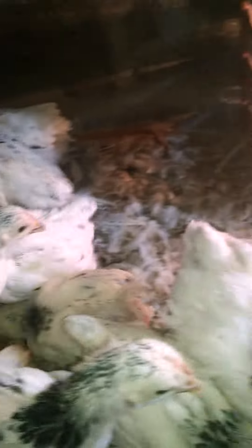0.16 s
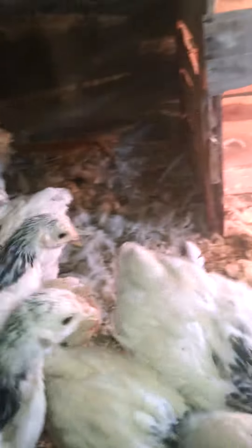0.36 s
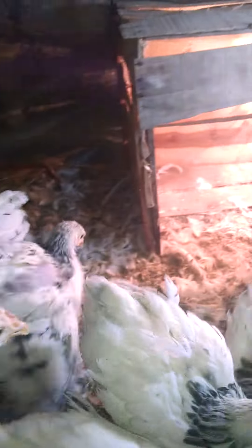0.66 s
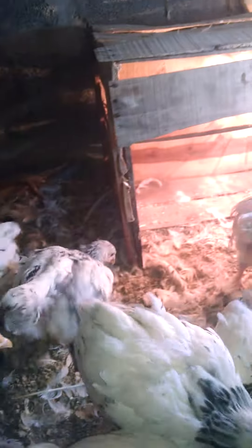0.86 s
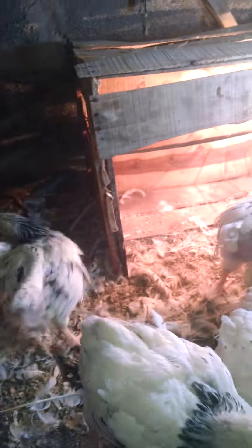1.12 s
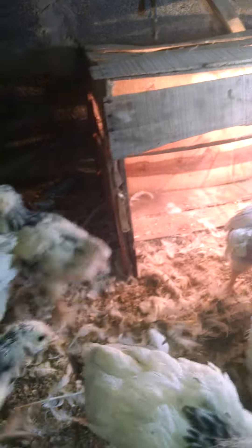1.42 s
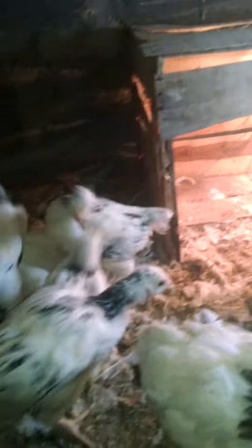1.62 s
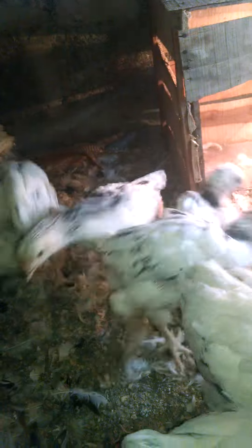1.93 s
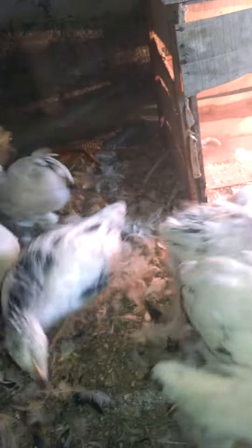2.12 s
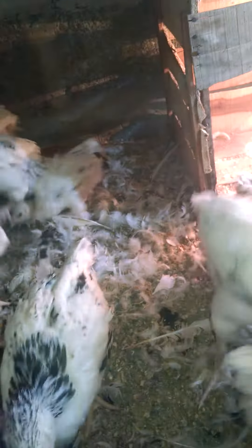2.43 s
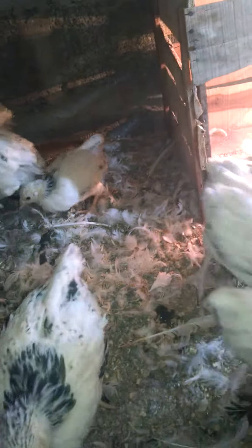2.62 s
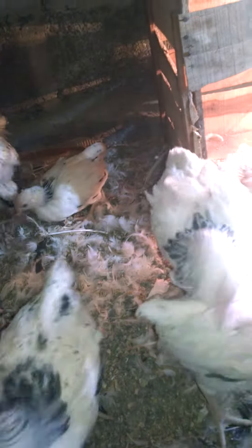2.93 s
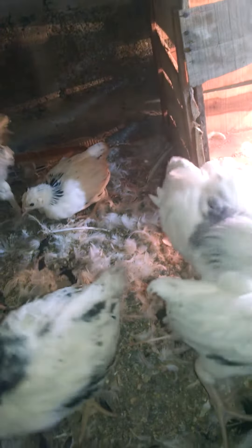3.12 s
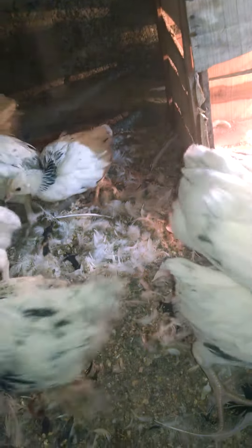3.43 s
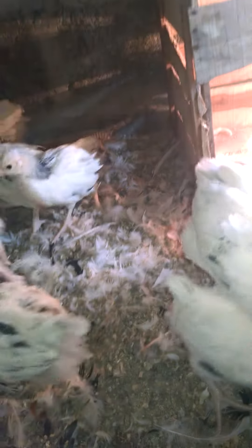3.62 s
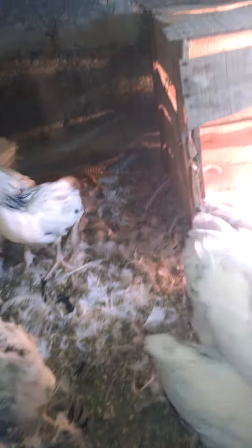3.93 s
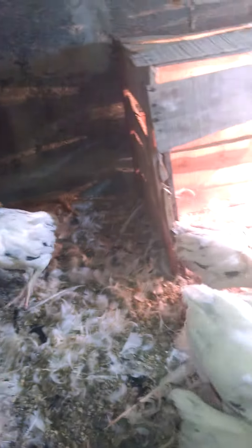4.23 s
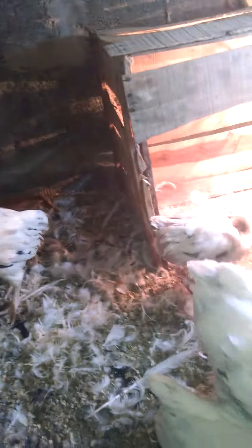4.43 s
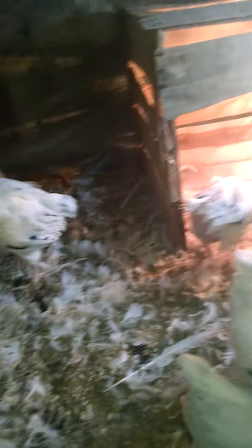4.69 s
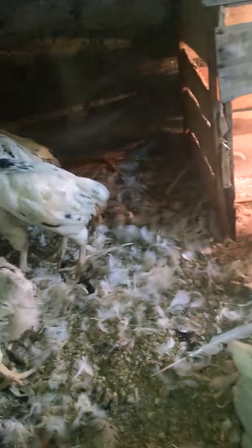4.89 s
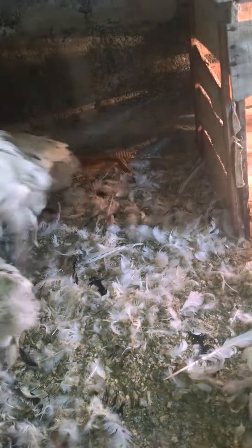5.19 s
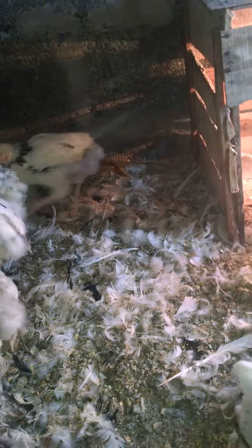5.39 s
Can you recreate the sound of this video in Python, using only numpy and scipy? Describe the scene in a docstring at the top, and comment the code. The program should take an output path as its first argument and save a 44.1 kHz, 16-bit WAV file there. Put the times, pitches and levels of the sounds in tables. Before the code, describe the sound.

Many young chicks peep over each other without pause, short falling whistles close by, with soft foot thuds and dry litter crackle in a wooden pen.

```python
"""Young chicks peep over one another all the time, in a small wooden pen, close to a hand-held phone.
Each peep is a whistle that glides down; many then break to a low note as the syrinx (voice organ) relaxes.
Feet thud on ringing floor boards and shuffle, as filtered noise; claws and beaks tick and crackle in litter.
The plank walls answer briefly, with a few echoes and a fading noise tail."""
import sys
import numpy as np
from scipy import signal
from scipy.fft import rfft, irfft, next_fast_len
from scipy.io import wavfile
from scipy.ndimage import uniform_filter1d, minimum_filter1d, map_coordinates

SR = 44100
rng = np.random.default_rng(int(sys.argv[2]) if len(sys.argv) > 2 else 0)


def write(x):
    x = np.atleast_2d(x).T
    wavfile.write(sys.argv[1], SR, np.round(np.clip(x, -1, 1) * 32767).astype(np.int16))


N = 244755  # length in samples

# All levels in the tables are relative: the functions below lift, shape or mix them further.
# Peeps that break to a low note. Each row: start in seconds, length of the glide in seconds,
# pitch at the start in Hz, pitch at the break in Hz, level in dB, level of the low note in dB.
BREAKING_PEEPS = [(0.0, 0.083, 3050, 2158, -21.5, -27.5), (0.285, 0.095, 3900, 2467, -15, -17.5),
                  (0.345, 0.1804, 3508, 2844, -14.5, -11), (0.415, .011, 2950, 2850, -17.5, -26),
                  (0.716, 0.068, 4000, 2700, -21.5, -26.5), (0.766, 0.13, 2950, 2170, -18, -28),
                  (1.098, 0.13, 3580, 2878, -22.5, -18.5), (1.283, 0.0064, 3000, 2720, -20.5, -48),
                  (1.443, 0.095, 3120, 2730, -25, -18.5), (1.448, 0.097, 4350, 2950, -17.5, -21),
                  (1.571, 0.08, 2850, 2240, -18, -33), (1.647, 0.043, 3330, 2456, -13.5, -16.5),
                  (1.871, 0.045, 2930, 2350, -18.5, -14.5), (1.977, 0.011, 4200, 3320, -12, -16.5),
                  (2.001, .022, 2950, 2426, -19, -27), (2.25, .028, 3490, 2970, -31.5, -19),
                  (2.286, 0.15, 3150, 2300, -25.5, -21), (2.354, 0.055, 3800, 2990, -18.5, -20.5),
                  (2.651, 0.2, 3900, 2600, -7.5, -12), (3.282, 0.073, 3650, 2430, -15, -17.5),
                  (3.402, 0.081, 4450, 2925, -19.5, -27), (3.745, 0.093, 3854, 2780, -16.5, -19),
                  (3.758, .026, 3800, 3150, -26, -17.5), (3.92, 0.049, 2700, 2250, -22.5, -19.5),
                  (4.052, .058, 3280, 2620, -22, -28), (4.349, 0.067, 3300, 2784, -26.5, -25.5),
                  (4.472, 0.058, 4400, 2600, -13.5, -24.5), (4.854, 0.026, 3050, 2550, -22.5, -14),
                  (4.97, .115, 3150, 2365, -24.5, -25.5), (5.32, 0.098, 3380, 3096, -20.5, -13),
                  (5.341, 0.15, 3100, 2220, -22, -22.5)]
# Peeps that only slide. Each row: start in seconds, length in seconds, pitch at the start in Hz,
# pitch at the end of the slide in Hz, arch above a straight glide in Hz (halfway), level in dB.
SLIDING_PEEPS = [(0.059, .12, 3300, 2440, -80.5, -21.5), (0.325, 0.22, 4050, 2950, 131, -20),
                 (0.567, 0.1, 4230, 4100, 27, -31.5), (0.637, .07, 3545, 3330, -78.5, -24.5),
                 (0.643, 0.083, 3983, 3220, -100, -24), (0.7, 0.057, 4020, 2393, 126, -15.5),
                 (0.799, 0.11, 3780, 3350, 56, -30), (0.904, 0.079, 3270, 2650, 168, -14.5),
                 (1.121, 0.12, 3938, 2540, 153, -18.5), (1.419, 0.048, 3970, 2510, -150, -19),
                 (1.467, 0.15, 4050, 3524, -60, -18), (1.7, 0.1, 4110, 2374, -330, -21),
                 (1.784, 0.048, 3470, 2750, 206, -12.5), (1.827, 0.044, 4280, 3530, 131, -13),
                 (1.88, .08, 3420, 3254, 18, -21.5), (1.971, 0.046, 3295, 2556, 91, -10.5),
                 (2.098, 0.11, 3795, 3330, 52, -24), (2.204, 0.042, 3150, 3640, 138, -22.5),
                 (2.266, 0.15, 3850, 2600, 59.5, -19), (2.436, .062, 3360, 2150, 150, -11),
                 (2.549, 0.065, 3274, 2300, -87, -21), (2.555, 0.057, 3280, 2900, 154, -22),
                 (2.839, 0.059, 3690, 2680, -130, -19), (2.899, 0.11, 4402, 3580, 31, -12),
                 (2.995, 0.065, 3580, 2996, 194, -12), (2.939, .11, 4290, 2740, -480, -16),
                 (2.997, 0.079, 2645, 2247, 45.5, -24), (3.048, 0.1, 3470, 2350, 198, -22.5),
                 (3.196, .08, 4300, 2460, -100, -17), (3.296, .23, 3630, 2726, 150.5, -17),
                 (3.535, 0.085, 3900, 2410, 205, -33), (3.85, 0.06, 4150, 3160, -200, -29.5),
                 (4.124, .11, 3770, 3310, -100, -29), (4.235, 0.11, 4400, 2500, 274, -23),
                 (4.291, 0.052, 3280, 2390, -59, -15), (4.525, .02, 4200, 3600, -100, -20),
                 (4.553, 0.076, 4100, 3210, -110, -20), (4.588, 0.14, 4280, 2167, -200, -19.5),
                 (4.7, 0.12, 4100, 3270, 147.5, -13), (4.784, .055, 2840, 2376, -90, -14),
                 (4.86, 0.082, 3910, 2594, -250, -17), (5.023, 0.059, 4240, 2530, -120, -15),
                 (5.114, 0.14, 3970, 3250, -59.5, -16.5), (5.226, 0.11, 3450, 2600, -36, -17),
                 (5.231, 0.035, 3090, 2524, -100, -12.5), (5.256, 0.065, 4200, 2910, 304.5, -15.5),
                 (5.444, 0.066, 3870, 3090, 153, -17), (5.501, 0.064, 2920, 2800, 7, -23)]
# Effort of a breaking peep: level in dB at the start, at the crest, at the break.
BREAKING_EFFORT_DB = [-9.5, 0, -0.5]
# Effort of a sliding peep: level in dB at the start, at the crest, at the end, after settling.
SLIDING_EFFORT_DB = [-7, -1.5, -3.5, -17.5]
# A whistle swells as it crosses this throat resonance. Each row: pitch in Hz, level in dB.
THROAT_RESONANCE = [(1500, -4), (2300, 3.5), (3100, -0.5), (3700, -3), (4400, -2)]
# Overtones of a whistle. Each row: multiple of the pitch, level in dB.
WHISTLE_OVERTONES = [(2, -23), (3, -23.5), (4, -32.5)]
# Colour of those overtones. Each row: frequency in Hz, level in dB.
BEAK_COLOUR = [(4000, 9.5), (5000, -3), (6600, 2.5), (7900, -14), (10000, -16), (15000, -5)]
# Colour of the husky noise in hard calling. Each row: frequency in Hz, level in dB per Hz.
HUSK_COLOUR = [(1000, -19.5), (2000, -1), (2500, -15.5), (3900, 9.5), (4800, -18.5), (6500, -8.5),
               (8000, -39), (15000, -28.5)]
# Basic delay of the left port. Each row: frequency in Hz, delay in seconds (each peep scales it).
LEFT_PORT_LAG = [(1200, 0.0000043), (2200, 0.00018), (3500, 0.00029)]
# The phone's body shades the left port. Each row: frequency in Hz, left minus right in dB.
PHONE_SHADE = [(1000, 3.5), (2500, 0), (3500, 0.5), (4400, -2.5), (8000, .5)]
# Feet and pecks on the ground. Each row: start in seconds, peak of the knock in dB,
# centre of the knock in Hz, level of the boom in dB.
FOOT_THUDS = [(0.136, -31.5, 540, -40.5), (0.546, -28, 412, -51), (0.844, -21.5, 385, -61),
              (0.945, -43, 377, -39), (1.026, -24, 563, -47), (1.13, -23.5, 366, -54),
              (1.572, -30, 307, -33), (1.935, -21.5, 301, -41), (2.092, -28.5, 415, -50),
              (2.266, -34, 468, -30), (2.414, -30, 441, -49), (2.94, -20, 412, -41),
              (3.694, -26.5, 550, -57), (3.742, -27.5, 573, -56), (3.969, -21.5, 414, -32.5),
              (4.14, -31, 307, -38.5), (4.413, -26, 415, -39.5), (4.827, -21, 409, -50),
              (4.965, -25, 420, -44), (5.142, -23, 592, -38), (5.334, -20, 420, -45)]
# Higher modes of the floor. Each row: frequency in Hz, width in Hz (wider dies faster), level in dB.
FLOOR_MODES = [(329, 74, -5.5), (415, 69, 4), (536, 31, -4.5), (780, 350, -27)]
# How busily the flock moves. Each row: time in seconds, trampling in dB, scratching in dB.
FLOCK_BUSTLE = [(0.0, -45.5, -56), (0.63, -50.5, -67), (0.88, -45, -65), (1.1, -45.5, -57.5),
                (1.34, -50, -61.5), (1.84, -52, -60), (2.18, -49, -62.5), (2.44, -43, -55.5),
                (2.87, -50, -67.5), (3.03, -58, -64), (3.25, -54.5, -62.5), (4.28, -46, -58.5),
                (4.62, -45, -50), (5.07, -47, -57.5), (5.25, -37, -53.5), (5.55, -43, -47)]
# Colour of the shuffling feet. Each row: frequency in Hz, level in dB per Hz.
GROUND_COLOUR = [(30, -14), (70, -6.5), (125, -2.5), (190, -6.5), (430, -3), (800, -12), (1300, -13.5),
                 (5000, -34.5)]
# Beak ticks and snapping litter. Each row: start in seconds, level in dB.
BEAK_TICKS = [(0.143, -43), (0.6692, -37.5), (1.2354, -32), (1.243, -31), (1.2607, -52), (1.841, -35.5),
              (1.8705, -34.5), (2.251, -37), (2.8454, -38), (2.935, -34.5), (3.7165, -39.5), (4.019, -38.5),
              (4.9588, -33.5), (5.0508, -33.5)]
# Colour of the dry bedding. Each row: frequency in Hz, level in dB per Hz.
LITTER_COLOUR = [(400, 0), (1200, -1.5), (3500, 11.5), (5000, 2.5), (6800, 2.5), (7900, -12), (9300, -5),
                 (14000, -31), (15800, -30)]
# How long the pen rings. Each row: frequency in Hz, time to fade by 60 dB in seconds.
PEN_FADE = [(150, 0.61), (2500, 0.032), (10000, 0.16)]

ARCH_HZ_PER_S = 1400  # the longer a breaking peep, the longer it holds its pitch before falling
TIRING_DB_PER_S = 43  # the longer a breaking peep, the weaker it is when it breaks
LOW_NOTE_HZ, LOW_NOTE_S, LOW_NOTE_FADE_DB = 1597, .026, -3.5  # low note after a break at the usual pitch
LOW_NOTE_FOLLOWS, USUAL_BREAK_HZ = 0.433, 2600  # a higher break lands on a higher low note
SETTLE_S, SETTLE_RATIO = 0.017, .95  # a sliding peep sinks a little more as it dies
ATTACK_S, RELEASE_S = .008, .006
BOOM_HZ, BOOM_WIDTH_HZ, BOOM_DB = 127, 23.6, 7.5  # lowest floor mode, and the lift added to each boom
TOP_HZ = 15600  # the phone keeps nothing above this


def chorus(distant_db=-46, joining_db=-13.0, husk_db=-20):
    """Farther birds never stop and join in when the near ones call; hard calling adds a husky edge."""
    near = near_chicks()
    husk = unit(filtered(pair(apart=0.45), lambda hz: amp(along(HUSK_COLOUR, hz))))
    far_level = amp(distant_db) + amp(joining_db) * loudness(near, seconds=0.078)
    far = far_level * far_chicks()
    husky_edge = amp(husk_db) * loudness(near, seconds=0.029) * husk
    return amp(-0.29) * near + far + husky_edge


def near_chicks(pan_db=-4.0, pan_spread_db=3.52, aside=1.023, aside_spread=0.13):
    """The birds around the phone, mostly a little to the right: there louder and earlier."""
    out = np.zeros((2, N))
    calls = [(s, breaking(*row)) for s, *row in BREAKING_PEEPS]
    calls += [(s, sliding(*row)) for s, *row in SLIDING_PEEPS]
    places = rng.standard_normal((len(calls), 2))
    for (start, call), (turn, shade) in zip(calls, places):
        sound = peep(*call, pan_db=pan_db + pan_spread_db * shade, aside=aside + aside_spread * turn)
        add(out, start, sound)
    return out


def breaking(glide, start_hz, break_hz, db, low_db):
    """Lengths, pitches and levels of a peep that arches down, then drops to the low note."""
    low_hz = LOW_NOTE_HZ + LOW_NOTE_FOLLOWS * (break_hz - USUAL_BREAK_HZ)
    middle_hz = (start_hz + break_hz) / 2 + ARCH_HZ_PER_S * glide
    first, top, last = np.add(db, BREAKING_EFFORT_DB)
    levels = [first, top, last - TIRING_DB_PER_S * glide, low_db, low_db + LOW_NOTE_FADE_DB]
    return glide, LOW_NOTE_S, [start_hz, middle_hz, break_hz, low_hz], levels


def sliding(glide, start_hz, end_hz, arch_hz, db):
    """Lengths, pitches and levels of a peep that slides down and settles without a break."""
    middle_hz = (start_hz + end_hz) / 2 + arch_hz
    pitches = [start_hz, middle_hz, end_hz, end_hz * SETTLE_RATIO]
    return glide, SETTLE_S, pitches, np.add(db, SLIDING_EFFORT_DB)


def peep(glide, tail, pitches, levels, pan_db, aside, waver=0.00828, flutter_db=3.0, rasp=0.12,
         half_db=-20, drop=4):
    """One whistle with overtones as it reaches the two ports, the left one later."""
    glide, tail = max(glide, .004), max(tail, .004)
    t = np.arange(int((glide + tail) * SR)) / SR
    size = len(t)
    # a smooth curve through the start, middle and end pitches
    curve = np.polyfit([0, .5, 1], pitches[:3], 2)
    hz = np.polyval(curve, np.minimum(t / glide, 1))
    # after the glide the pitch moves fast, then settles on the last pitch
    ending = np.clip((t - glide) / tail, 0, 1)
    hz += (pitches[3] - pitches[2]) * (1 - (1 - ending) ** drop)
    hz *= 1 + waver * wobble(160.7, size)
    # half the delay goes to each port, with opposite signs
    lag_cycles = np.outer([.5, -.5], hz * aside * along(LEFT_PORT_LAG, hz))
    phase = 2 * np.pi * (np.cumsum(hz) / SR - lag_cycles)

    tone = np.sin(phase) * (1 + rasp * wobble(1400, size))
    for order, db in WHISTLE_OVERTONES:
        overtone_db = db + along(BEAK_COLOUR, order * hz) + 1.85 * wobble(47.3, size)
        tone += amp(overtone_db) * np.sin(round(order) * phase)
    # on low notes the slack membrane doubles its period: lines at half and one and a half times the pitch
    slack = np.clip((3400 - hz) / 1000, 0, 1)
    half_lines = np.sin(1.5 * phase) + .5 * np.sin(phase / 2)
    tone += slack * amp(half_db + 4 * wobble(25, size)) * half_lines

    edges = np.clip(t / ATTACK_S, 0, 1) * np.clip((t[-1] - t) / RELEASE_S, 0, 1)
    level = effort(t, glide, tail, levels) + along(THROAT_RESONANCE, hz)
    pan = amp([[pan_db / 2], [-pan_db / 2]])
    return tone * edges * amp(level + flutter_db * wobble(107.9, size)) * pan


def effort(t, glide, tail, levels, crest=0.68):
    """Level of a peep in dB: a rounded swell over the glide, then straight steps through the ending."""
    first, top, last = levels[:3]
    u, crest = t / glide, np.clip(crest, .1, .9)  # both as parts of the glide
    rise = (first - top) * (1 - u / crest) ** 2
    fall = (last - top) * ((u - crest) / (1 - crest)) ** 2
    swell = top + np.where(u < crest, rise, fall)
    steps = np.linspace(glide, glide + tail, len(levels) - 2)
    return np.where(u < 1, swell, np.interp(t, steps, levels[2:]))


def far_chicks(count=130):
    """The rest of the flock at an even level: the same glide at random times, lengths and pitches."""
    out = np.zeros((2, N))
    for k, (when, length, voice, size, place) in enumerate(rng.random((count, 5))):
        pitches = np.array([4050, 3300, 2600, 2250]) * (.85 + .27 * voice)
        levels = np.array([10, -7, 13.0, -13]) - 6 * size
        call = peep(.07 + .12 * length, 0.0234, pitches, levels, pan_db=-2.5, aside=0.66 + 0.39 * place)
        add(out, (k + when) / count * N / SR, call)
    return unit(out)


def thuds():
    """Soft feet boom on the floor; harder blows knock its higher modes, which ring and die away."""
    out, t = np.zeros(N), np.arange(SR // 6) / SR
    boom = np.exp(-np.pi * BOOM_WIDTH_HZ * t) * np.sin(2 * np.pi * BOOM_HZ * t)
    for s, db, centre, boom_db in FOOT_THUDS:
        ring = np.zeros(len(t))
        for hz, width, level in FLOOR_MODES:
            # modes far from the centre of the knock are weaker
            mode_db = level + rng.normal(0, 0.71) - 15.0 * np.log2(hz / centre) ** 2
            mode = np.cos(2 * np.pi * hz * rng.normal(1, 0.052) * t)
            ring += amp(mode_db) * np.exp(-np.pi * width * t) * mode
        # the blow is followed by a short scuff of the toes
        scuff = 0.11 * rng.standard_normal(len(t)) * np.exp(-t / 0.016)
        blow = signal.fftconvolve((t == 0) + scuff, ring)
        add(out, s, amp(db + 1.5) * blow / np.abs(blow).max())
        add(out, s, amp(boom_db + BOOM_DB) * boom)
    return out


def litter():
    """Many feet shuffle on the ground; claws and beaks crackle in dry bedding, all as shaped noise."""
    trample_db, scratch_db = bustle()
    steps = pair(apart=0.39) * amp(5.24 * wobble(35, N))
    shuffle = unit(filtered(steps, lambda hz: amp(along(GROUND_COLOUR, hz))))
    # slow and fast level changes make the noise grainy
    grain = amp(5 * wobble(45, N) + 5 * wobble(900, N))
    crackle = unit(pair(apart=0.99) * grain) * amp(scratch_db + 11.5)
    t = np.arange(SR // 25) / SR
    for s, db in BEAK_TICKS:
        tick = rng.standard_normal((2, len(t))) * amp(-60 * t / 0.072)
        add(crackle, s, amp(db + 5) * tick)
    bedding = filtered(crackle, lambda hz: amp(along(LITTER_COLOUR, hz) + 5.5))
    return shuffle * amp(trample_db + 3.5) + bedding


def bustle():
    """How busily the feet trample and scratch, in dB, one value per sample."""
    s, *columns = np.transpose(FLOCK_BUSTLE)
    return [np.interp(np.arange(N) / SR, s, column) for column in columns]


def pen(x, wet_db, walls_db, count=8):
    """A few plank echoes and a short diffuse tail of noise, each pitch fading at its own speed."""
    hz, t, z = signal.stft(rng.standard_normal((2, SR // 3)), SR, nperseg=256)
    fade = amp(-60 * t / along(PEN_FADE, hz)[:, None])
    tail = signal.istft(z * fade, SR, nperseg=256)[1]
    # the tail starts 5 ms after the direct sound
    answer = amp(wet_db) * np.pad(tail / np.linalg.norm(tail[0]), ((0, 0), (SR // 200, 0)))
    for port in answer:
        echo_at = (rng.uniform(.003, .02, count) * SR).astype(int)
        port[echo_at] += amp(walls_db) * rng.choice([-1, 1], count) / np.sqrt(count)
    return signal.fftconvolve(x, answer, axes=1)[:, :N]


def amp(db):
    """Decibels to gain."""
    return 10 ** (np.asarray(db) / 20)


def unit(x):
    """Scale to rms (average strength) 1."""
    return x / np.sqrt(np.mean(x ** 2) + 1e-20)


def along(points, hz):
    """Read a curve of (Hz, value) points on a log frequency axis."""
    f, v = np.transpose(points)
    return np.interp(np.log(hz + 1), np.log(f + 1), v)


def wobble(rate, size):
    """A smooth random curve, with rate random points a second."""
    knots = rng.standard_normal(int(size * rate / SR) + 4)
    return map_coordinates(knots, [np.arange(size) * rate / SR])


def filtered(x, response):
    """Multiply the spectrum of x by a response that depends on frequency."""
    m = next_fast_len(x.shape[-1] + 8192)
    spectrum = rfft(x, m) * response(np.fft.rfftfreq(m, 1 / SR))
    return irfft(spectrum, m)[..., :x.shape[-1]]


def add(track, s, sound):
    """Mix a sound into the track at time s, in seconds."""
    part = track[..., max(round(s * SR), 0):][..., :sound.shape[-1]]
    part += sound[..., :part.shape[-1]]


def pair(apart):
    """Noise at the two ports: a common part and a part that differs."""
    mid, side = rng.standard_normal((2, N))
    return unit(np.array([mid + apart * side, mid - apart * side]))


def loudness(x, seconds):
    """Running rms (average strength) of both ports together."""
    return np.sqrt(np.abs(uniform_filter1d(np.mean(x ** 2, axis=0), int(seconds * SR))))


def scene():
    """Chicks and their feet inside the pen."""
    birds = filtered(chorus(), lambda hz: amp(np.outer([.5, -.5], along(PHONE_SHADE, hz))))
    flock = birds + thuds()
    return flock + pen(flock, wet_db=-11.5, walls_db=-16.5) + litter()


def record(dry):
    """A fast limiter holds peaks just under full scale; the phone then cuts all above its band limit."""
    needed = np.minimum(.98 / (np.abs(dry).max(axis=0) + 1e-9), 1)
    gain = uniform_filter1d(minimum_filter1d(needed, size=256), size=256)
    return filtered(dry * gain, lambda hz: hz < TOP_HZ)


dry = scene()
out = record(dry)
write(out)
```